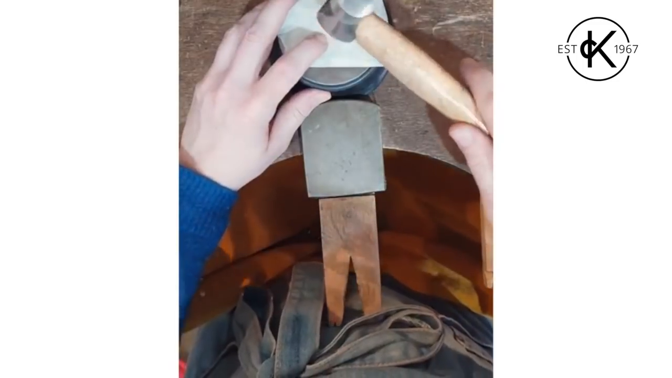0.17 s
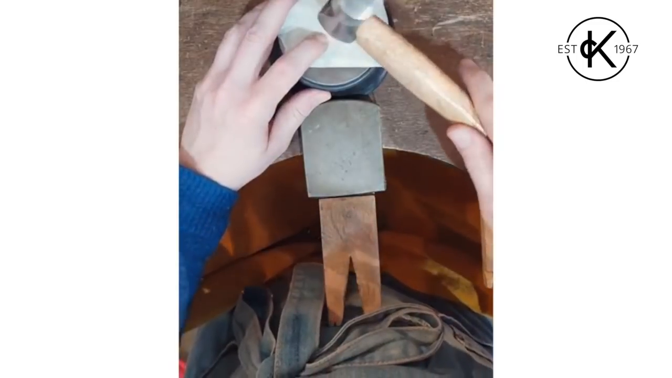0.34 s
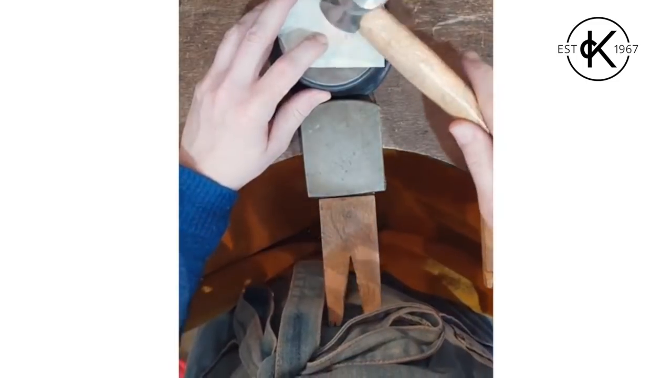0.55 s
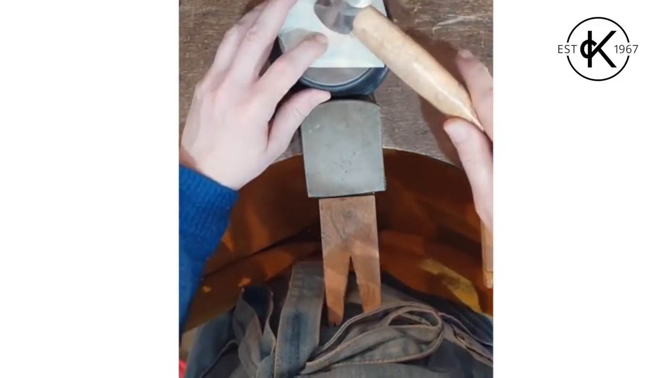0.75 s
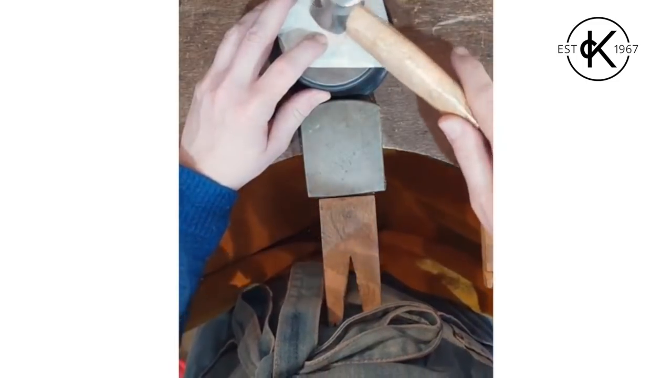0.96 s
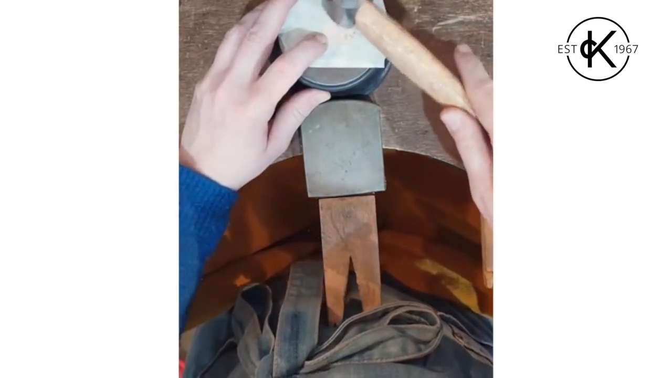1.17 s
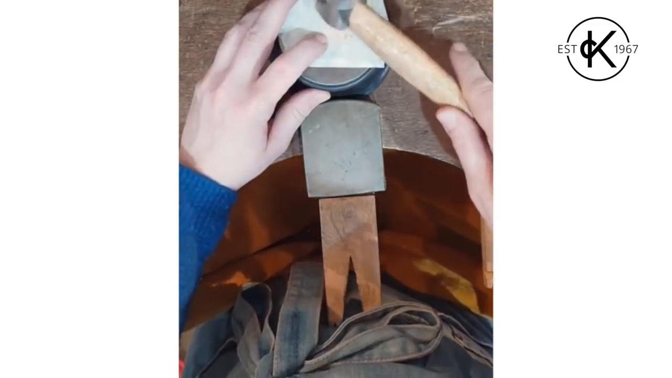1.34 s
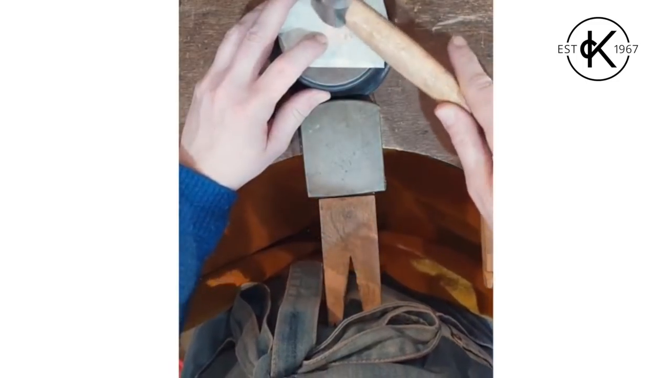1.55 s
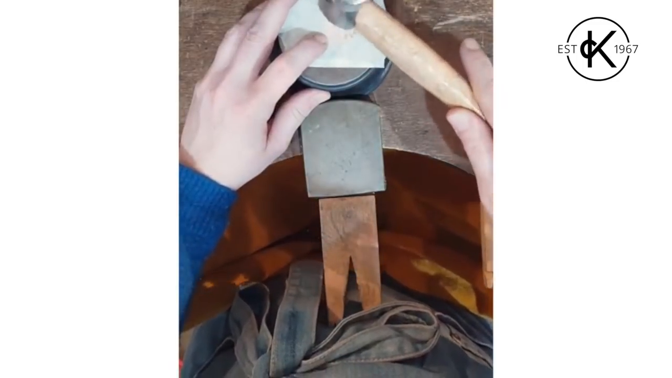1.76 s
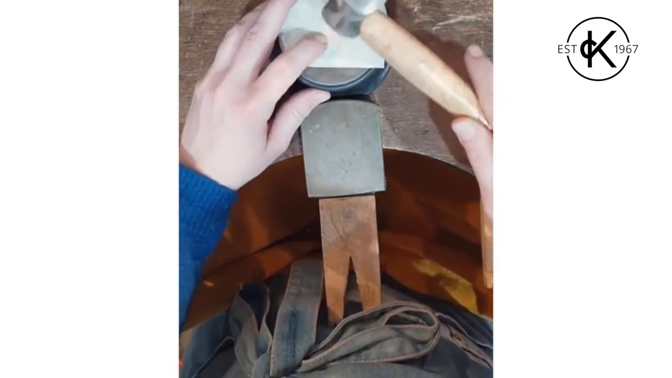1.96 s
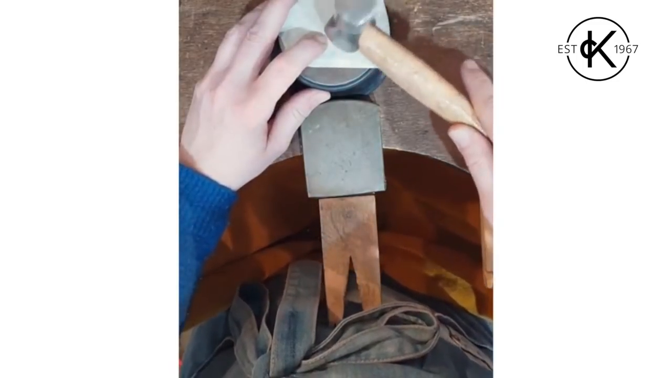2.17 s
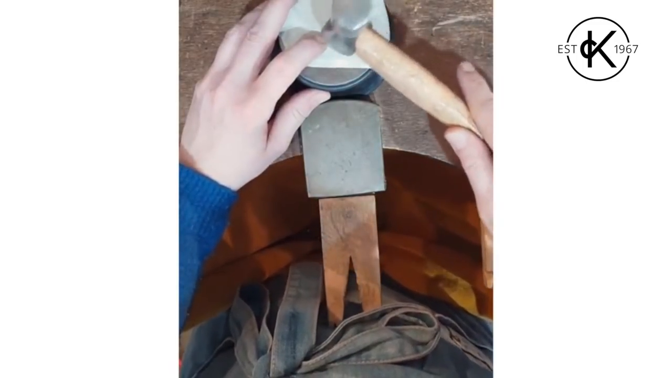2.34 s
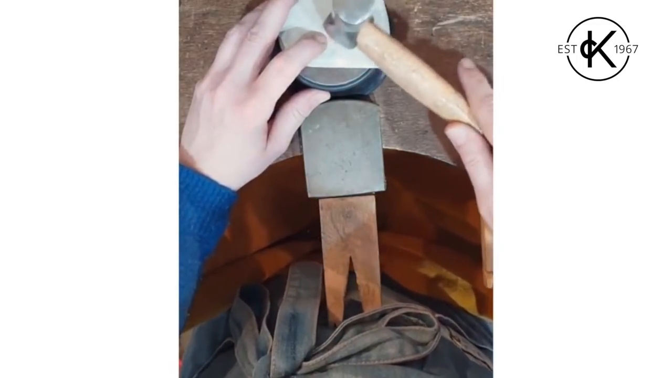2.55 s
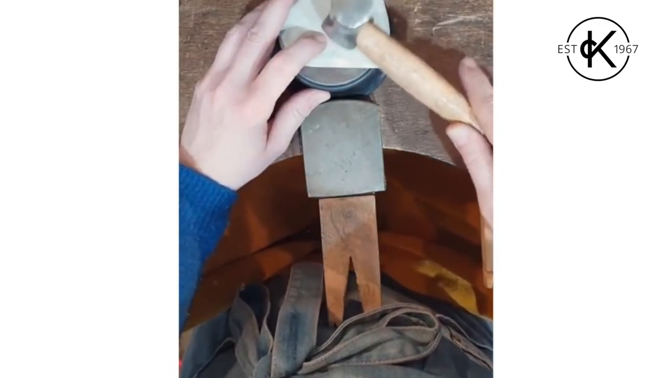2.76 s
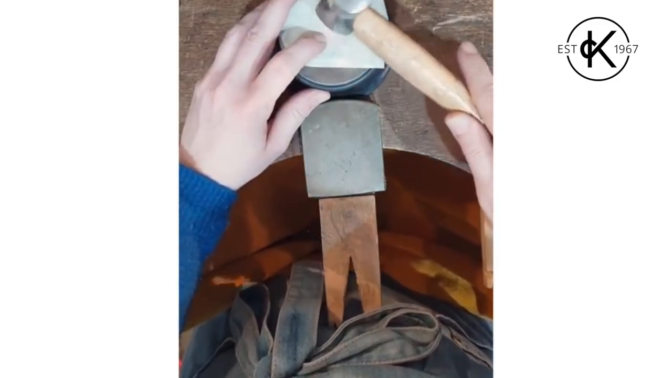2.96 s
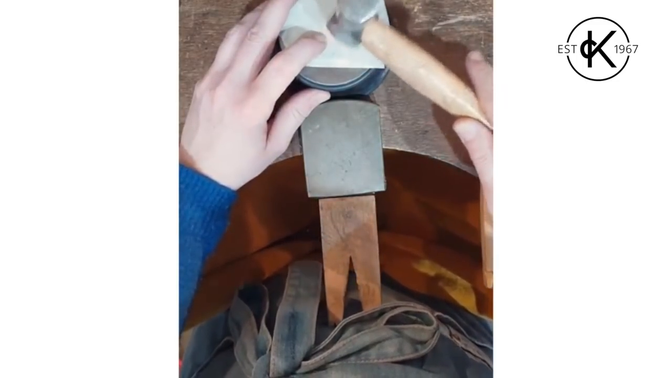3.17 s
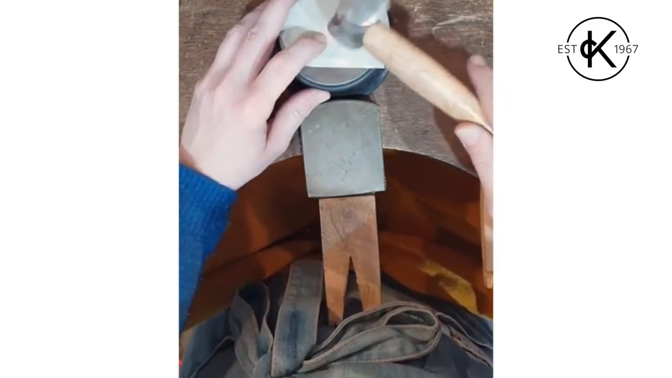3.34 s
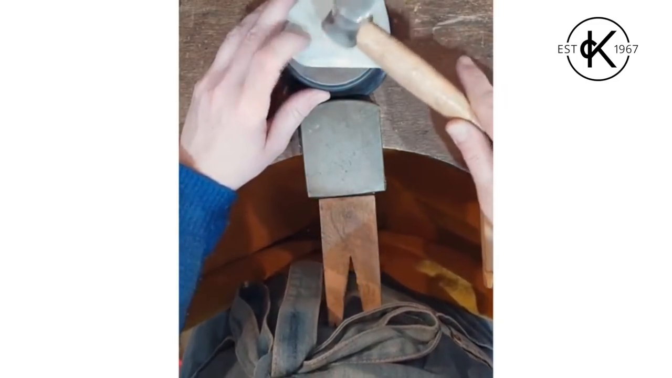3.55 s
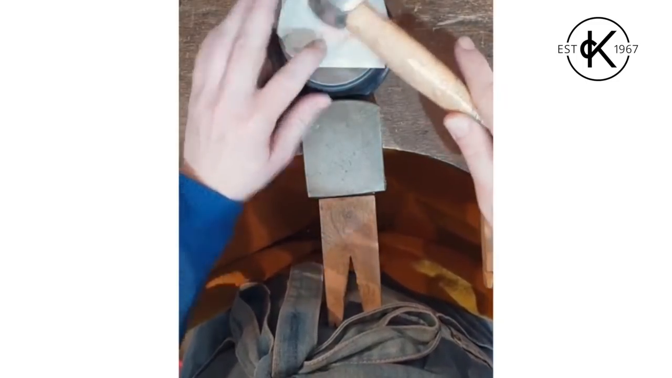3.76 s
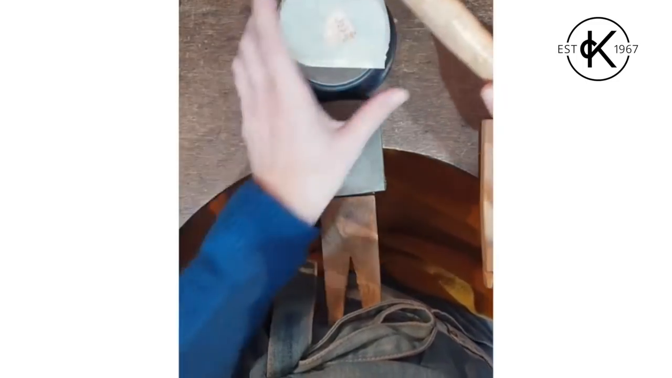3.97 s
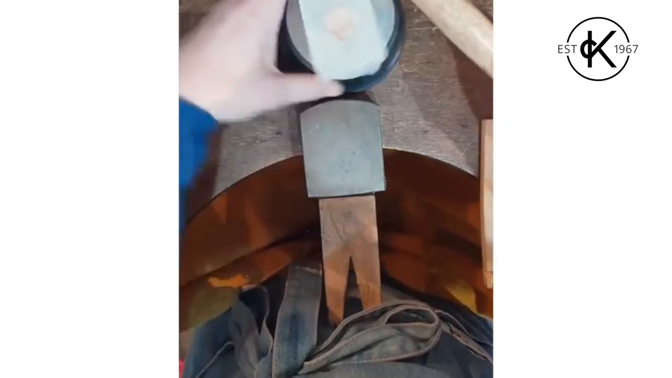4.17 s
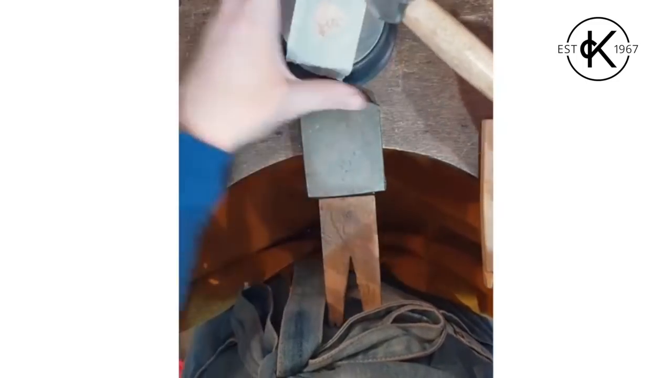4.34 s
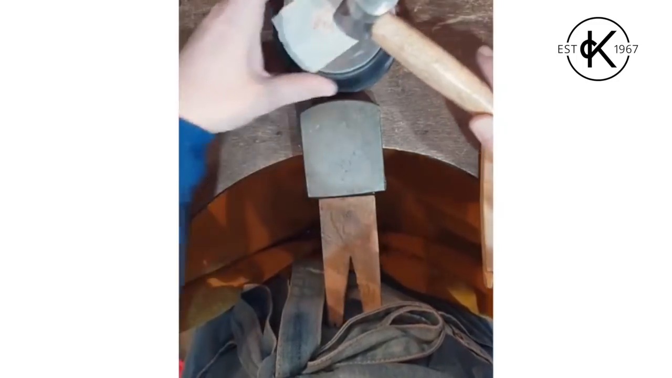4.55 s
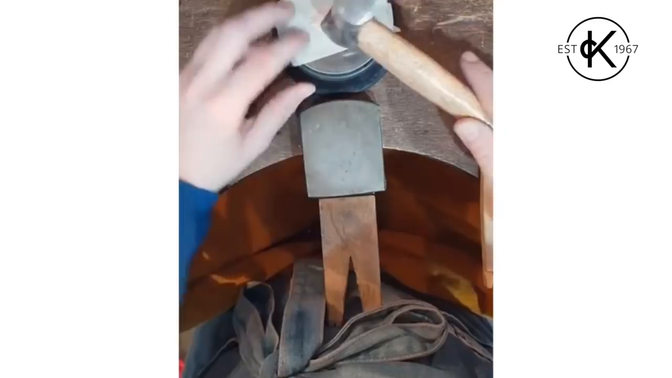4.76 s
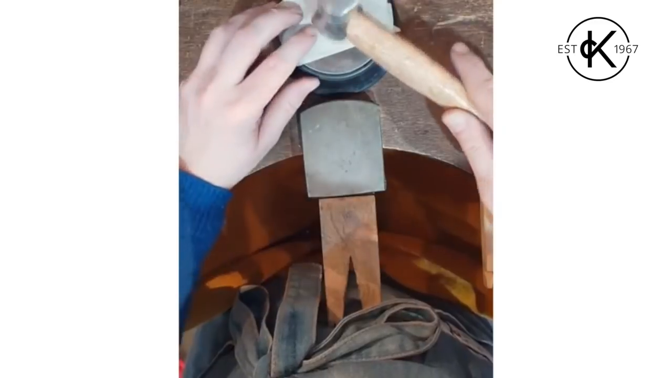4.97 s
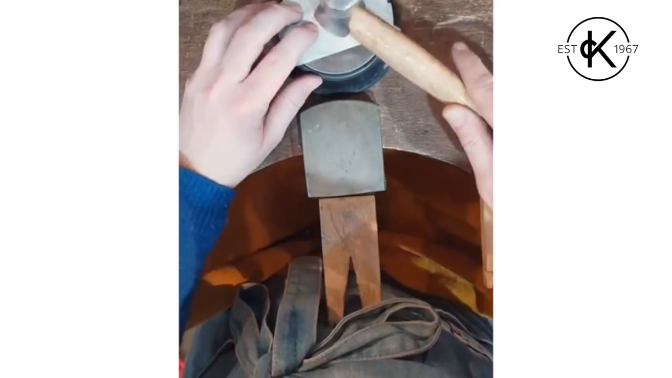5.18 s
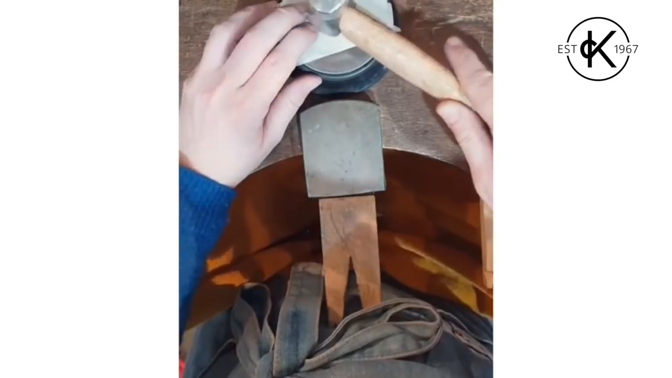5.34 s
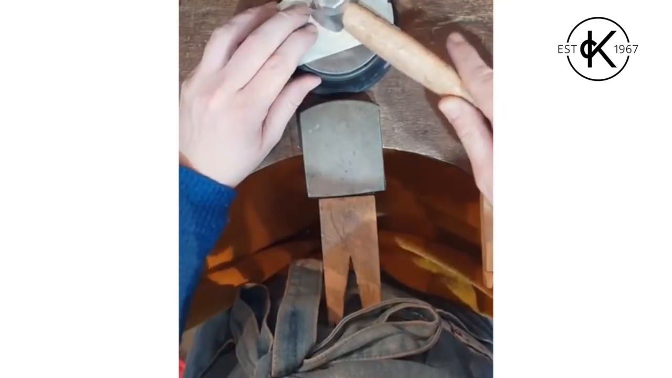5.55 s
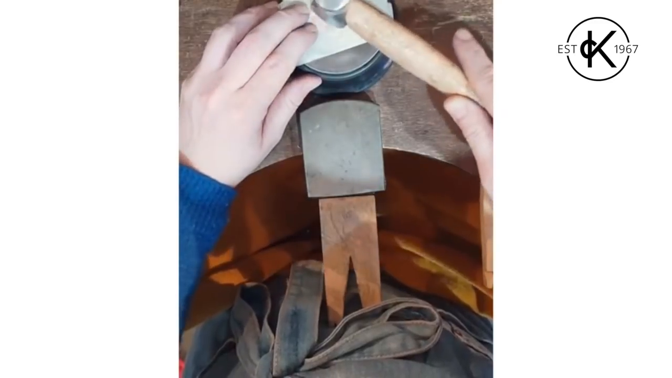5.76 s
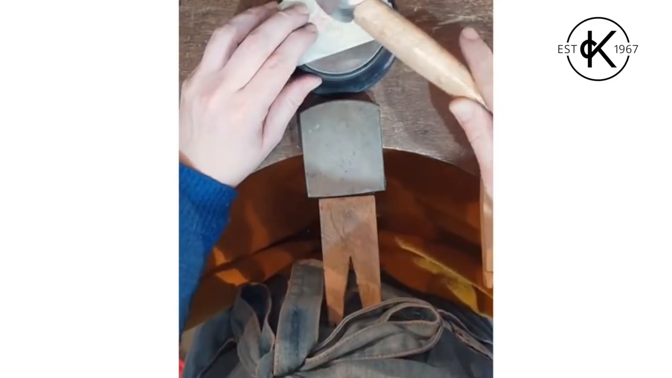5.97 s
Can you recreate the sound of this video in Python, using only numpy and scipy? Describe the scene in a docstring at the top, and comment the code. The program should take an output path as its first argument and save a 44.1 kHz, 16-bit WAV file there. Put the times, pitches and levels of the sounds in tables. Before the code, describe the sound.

Close stereo pickup in a small dry workshop: a light steel hammer taps sheet metal on a steel block, five or six bright clinks a second over a hollow wooden bench knock. After 22 blows it stops; a hand turns the block with a faint scrape and dull bump. Then six more blows, hard at first, then easing.

```python
"""A small steel hammer taps taped sheet metal on a steel block on a wooden bench, in a small, dry workshop.
First come 22 blows, five or six a second: a bright, quickly damped clink of steel modes and crack over
the hollow knock of bench modes, with a faint jangle and the room's answer.
In a pause a hand turns the block: shaped noise makes its scrape, dull bump and sheet ticks.
Then six more blows, hard at first. Soft noise gives the low hush of the room throughout."""
import sys
import numpy as np
from scipy import signal
from scipy.fft import rfft, irfft, next_fast_len
from scipy.io import wavfile
from scipy.ndimage import map_coordinates

SR = 44100
rng = np.random.default_rng(int(sys.argv[2]) if len(sys.argv) > 2 else 0)


def wav_record(signal):
    """Record a signal, one row per channel, as 16-bit PCM in the file named by sys.argv[1]."""
    frames = np.transpose(np.atleast_2d(signal))
    bounded = np.clip(frames, -1, 1)
    # unit amplitude maps onto the largest positive 16-bit level
    quanta = np.round(bounded * 32767).astype(np.int16)
    wavfile.write(sys.argv[1], SR, quanta)


N = 265041
TOP_HZ = 10500  # band limit

# hammer blows; edge is how sharply the face catches the sheet:
# (time [s], force over a light tap [dB], edge [dB])
BLOWS = [(-0.048, 4.5, 1.5), (0.1277, 5.5, 2), (0.3144, 3, 0.6), (0.495, 2.5, 3.5), (0.6831, 1, 0.2),
         (0.8613, 1, 0), (1.0439, 0.6, 1.5), (1.217, -.5, -1.5), (1.391, 1, -3.6), (1.5621, -0.9, -0.7),
         (1.7232, -0.75, -1), (1.9042, 0.5, 0), (2.0708, -.6, 3), (2.244, -0.5, 2.5), (2.411, -1, 1.7),
         (2.5821, 0.5, -2), (2.758, -0.76, 1.2), (2.9274, -1, 2), (3.0885, 0.5, -0.9), (3.2579, .5, 3.5),
         (3.428, 1.4, 1.2), (3.5933, -0.9, 7), (5.0253, 8.5, 1.5), (5.2204, 8.5, -3), (5.4062, 6, -1),
         (5.5764, 3, 2.5), (5.7435, 1.35, 0), (5.9113, 0, -1.5)]
# spectrum of steel meeting sheet: (frequency [Hz], density [dB per Hz])
CRACK_SPECTRUM = [(300, -21), (900, -10.5), (1800, -3.5), (2450, -10.5), (3400, 3.5), (4400, 9.5),
                  (5400, 7.5), (7200, 4.5), (8300, -5), (9500, -6.5), (10800, -43.5)]
# decay of workshop and loose metal: (frequency [Hz], t60 [s])
WORKSHOP_DECAY = [(100, 0.49), (500, 0.2), (1200, 0.21), (3000, 0.2), (4600, .19), (7500, 0.18),
                  (10000, 0.042)]


def amp(db):
    """Decibels to gain."""
    return 10 ** (np.asarray(db) / 20)


def unit(x):
    """x at rms 1."""
    return x / np.sqrt(np.mean(x ** 2) + 1e-20)


def along(points, hz):
    """(Hz, value) points interpolated on a log frequency axis."""
    f, v = np.transpose(points)
    return np.interp(np.log(hz + 1), np.log(f + 1), v)


def filtered(x, response):
    """x times a response of frequency."""
    n = x.shape[-1]
    m = next_fast_len(n + SR // 8)
    spectrum = rfft(x, m) * response(np.fft.rfftfreq(m, 1 / SR))
    return irfft(spectrum, m)[..., :n]


def tinted(x, colour):
    """x with the gains of a (Hz, dB) table."""
    return filtered(x, lambda hz: amp(along(colour, hz)))


def add(track, start_s, sound):
    """Mix a sound into a track from start_s on, cut to the track's ends."""
    start = round(start_s * SR)
    part = sound[..., max(-start, 0):max(track.shape[-1] - start, 0)]
    first = max(start, 0)
    track[..., first:first + part.shape[-1]] += part


def diffuse(spectrum, size):
    """Coloured noise of rms 1 that reaches the two microphones from all sides."""
    # left-right likeness of the diffuse field: (frequency [Hz], correlation)
    likeness = [(200, 0.98), (450, 0.93), (700, 0.43), (1200, 0.34), (2200, 0.088), (4000, -0.38),
                (9000, 1)]

    def mid_side_response(hz):
        angle = np.arccos(np.clip(along(likeness, hz), -1, 1)) / 2
        return amp(along(spectrum, hz)) * [np.cos(angle), np.sin(angle)]

    mid, side = filtered(rng.standard_normal((2, size)), mid_side_response)
    return unit(np.array([mid + side, mid - side]))


def click(spectrum, size=1024):
    """Minimum-phase pulse with this spectrum, peak 1: its energy comes as early as causality allows."""
    log_gain = np.log(amp(along(spectrum, np.fft.rfftfreq(size, 1 / SR))))
    cepstrum = irfft(log_gain)
    cepstrum[1:size // 2] *= 2
    cepstrum[size // 2 + 1:] = 0
    pulse = irfft(np.exp(rfft(cepstrum)))
    return pulse / np.abs(pulse).max()


def clink(t, crack_db=-6, chatter_db=-18, chatter_t60_s=0.026, vary_db=0.7, detune=0.016):
    """Steel meets sheet: a crack, a brief chatter of the sheet on the block, and a damped ring."""
    # modes of hammer head, sheet and block, damped by tape and hand, before each blow's variation:
    # (frequency [Hz], level [dB], t60 [s])
    steel_modes = [(1050, -30, .03), (1380, -30, .035), (1800, -26, .018), (2120, -39, .11),
                   (2780, -37, .09), (3150, -21, .012), (3950, -19, .01), (4190, -14, .014),
                   (4580, -12.5, .015), (4610, -37, .1), (4950, -21, .008), (5450, -21, .011),
                   (5850, -20, .011), (7050, -20, .011), (9350, -31, .01), (856, -55, .6)]
    # paths from the hammer face, direct and off block, bench top and hand:
    # (left delay [s], right delay [s], left level [dB], right level [dB])
    paths = [(0, .0002, 0, -1.5), (.00065, .00088, -11, -9), (.002, .00215, -9, -12),
             (.00262, .00275, -13, -14)]
    hz, db, t60 = np.transpose(steel_modes)[:, :, None]
    size, shift = rng.standard_normal((2, *hz.shape))  # every blow lands on a new spot
    fade = amp(db + vary_db * size - 60 * t / t60)
    strike = -(fade * np.sin(2 * np.pi * hz * (1 + detune * shift) * t)).sum(0)
    add(strike, 0, -amp(crack_db) * click(CRACK_SPECTRUM))
    pair = amp(chatter_db - 60 * t / chatter_t60_s) * diffuse(CRACK_SPECTRUM, len(t))
    for left_s, right_s, left_db, right_db in paths:
        add(pair[0], left_s, amp(left_db) * strike)
        add(pair[1], right_s, amp(right_db) * strike)
    return pair


def shading(depth_db, count):
    """A random (Hz, dB) ripple that deepens towards the treble: short waves depend most on the spot struck."""
    hz = np.linspace(0, TOP_HZ, count)
    ripple_db = depth_db * (hz / TOP_HZ) ** (1 / 3) * rng.standard_normal(count)
    return np.column_stack([hz, ripple_db])


def bench(t, vary_db=1.14):
    """The block pushes the bench top down; its modes build up and die away."""
    # modes of the wooden bench: (frequency [Hz], level [dB], t60 [s], build-up [s])
    bench_modes = [(76.7, -33, 0.36, 0.0336), (94.1, -14.5, 0.18, 0.061), (140.3, -20, 0.258, 0.11),
                   (176.7, -28, 0.24, 0.0026), (227.9, -18, 0.18, 0.0012), (262, -13, 0.095, 0.0052),
                   (310, -32, 0.12, 0.087), (342.3, -15, 0.15, 0.052), (381, -17.5, 0.12, 0.0029),
                   (447.6, -27, 0.13, 0.0018), (466.9, -18, 0.13, 0.0045), (508.2, -28.5, 0.18, 0.0185),
                   (562.8, -16.5, 0.092, 0.0061), (594.8, -26.5, 0.186, 0.0018),
                   (640.4, -30.5, 0.166, 0.0051), (837, -40.5, 0.25, 0.018), (905.3, -31, 0.119, 0.0059)]
    # lead of the bench's sound at the left microphone: (frequency [Hz], phase [rad])
    left_lead = [(100, 0.11), (400, 0.25), (560, 1.08), (690, 2.3), (1000, 1.7)]
    hz, db, t60, rise = np.transpose(bench_modes)[:, :, None]
    swell = amp(db - 60 * t / t60) * (1 - np.exp(-t / rise))
    lag_rad = np.array([0 * hz, along(left_lead, hz)])  # left, right
    modes = -swell * np.sin(2 * np.pi * hz * t - lag_rad)
    strengths = amp(vary_db * rng.standard_normal((len(BLOWS), len(hz))))
    return strengths @ modes  # channels x blows x time


def jangle(t, count=170, vary_db=4, lag_s=.00022, scatter_rad=0.47, build_s=0.0026):
    """Many weak metal modes, the same for every blow but at new random strengths."""
    # dense, faint ringing of the metal on the bench: (frequency [Hz], level per mode [dB])
    jangle_levels = [(950, -0.5), (1500, -2.5), (1900, 3.5), (2300, -4), (3000, 0), (3900, 2.5), (4600, 3),
                     (5000, -3), (7200, -3), (8000, -11.5), (9500, -30)]
    hz = np.linspace(jangle_levels[0][0], jangle_levels[-1][0], count)[:, None]
    hz = hz + rng.normal(0, 25, (count, 1))
    phase = 2 * np.pi * (hz * t + rng.random((count, 1)))
    right_lag_rad = 2 * np.pi * hz * lag_s + scatter_rad * rng.standard_normal((count, 1))
    fade = amp(along(jangle_levels, hz) - 60 * t / along(WORKSHOP_DECAY, hz))
    modes = fade * (1 - np.exp(-t / build_s)) * np.sin([phase, phase - right_lag_rad])
    strengths = amp(vary_db * rng.standard_normal((len(BLOWS), count)))
    return strengths @ modes / np.sqrt(count)  # channels x blows x time


def rattle(t, depth_db=2, rate_hz=260):
    """The uneven gain, rms 1, of loose metal that keeps touching the block while it rings."""
    wander = map_coordinates(rng.standard_normal(len(t) // 20), [t * rate_hz])
    return unit(amp(depth_db * wander))


def detuned(pair, depth=.005):
    """A ring made slightly higher or lower: the hand's pressure on the sheet changes from blow to blow."""
    at = np.arange(pair.shape[-1]) * (1 + depth * rng.standard_normal())
    return np.array([map_coordinates(side, [at]) for side in pair])


def walls(t, build_s=0.002):
    """The workshop's answer: a diffuse tail in which every frequency dies at its own speed."""
    # spectrum of the answer at its start: (frequency [Hz], density [dB per Hz])
    answer_spectrum = [(30, -15.5), (80, -7.5), (250, 0.5), (600, 8), (740, 2.5), (950, 4), (1500, -3),
                       (2400, -0.5), (3900, -2.5), (4600, 5.5), (5000, -6.5), (7300, -7), (8300, -26),
                       (10500, -42.5)]
    hz, when, z = signal.stft(diffuse(answer_spectrum, len(t)), SR, nperseg=256)
    decay = amp(-60 * when / along(WORKSHOP_DECAY, hz)[:, None])
    tail = signal.istft(z * decay, SR, nperseg=256)[1]
    return tail[:, :len(t)] * (1 - np.exp(-t / build_s))


def blow_colour(force_db, edge_db):
    """(Hz, dB) balance of a blow: force adds most in the bass, edge in the treble."""
    # (frequency [Hz], light tap [dB], gain per force [dB/dB], gain per edge [dB/dB])
    growth = [(70, -1.4, 1.22, 0.43), (171.3, 0, 1.08, 0), (550, 0.5, 0.92, 0), (1420, 1.5, 0.99, 0.29),
              (4130, -3, .5, 0.16), (6770, -1.52, 0.78, 0.99)]
    return [(hz, db + per_force * force_db + per_edge * edge_db) for hz, db, per_force, per_edge in growth]


def hammer(bench_db=0, jangle_db=-25.0, room_db=-25.0, steady=0.5, spot_db=2, ripple_db=4.0,
           jangle_growth=0.58, clink_hold=0.73):
    """Blow after blow: the steel clinks, the bench knocks, loose metal jangles and the workshop answers."""
    track = np.zeros((2, N))
    t = np.arange(SR // 3) / SR
    knocks = amp(bench_db) * bench(t)
    jangles = amp(jangle_db) * jangle(t)
    same_paths = walls(t)  # the hammer hardly moves, so the room's answer partly repeats
    for k, (start_s, force_db, edge_db) in enumerate(BLOWS):
        # the level limit holds the clink back on heavy blows
        steel = amp(-clink_hold * force_db) * tinted(clink(t), shading(spot_db, count=20))
        room = amp(room_db) * (np.sqrt(steady) * same_paths + np.sqrt(1 - steady) * walls(t))
        # after a heavy blow the jangle stands louder against the limited clink
        loose = amp(jangle_growth * force_db) * rattle(t) * detuned(jangles[:, k])
        tail = tinted(loose + room, shading(ripple_db, count=56))
        blow = knocks[:, k] + steel + tail
        add(track, start_s, tinted(blow, blow_colour(force_db, edge_db)))
    return track


def hush():
    """The still room: steady diffuse noise, rms 1."""
    # (frequency [Hz], density [dB per Hz])
    hush_spectrum = [(20, 0), (38, -2.5), (160, 1.5), (300, -17), (600, -24), (1200, -37.5), (3500, -27.5),
                     (7000, -28), (9500, -39.5), (11000, -61)]
    return diffuse(hush_spectrum, N)


def turning(rumble_db=11, grit_db=2, grit_rate_hz=150, tick_t60_s=0.022):
    """The block's base drags unevenly over the wood and settles; the sheet ticks as it is gripped anew."""
    # sheet ticks under the fingers: (time [s], level [dB])
    ticks = [(4.236, -53), (4.295, -46.5), (4.325, -63), (4.37, -61), (4.483, -59)]
    # pushes of the block round on the bench: (start [s], length [s], scrape level [dB])
    slides = [(4.248, 0.059, -54), (4.572, 0.049, -67.5)]
    # low and high part of the drag: (frequency [Hz], density [dB per Hz])
    rumble_spectrum = [(40, -11), (90, -4.5), (165, 1), (230, -8), (275, -3), (340, -24.5), (550, -27.5),
                       (800, -27.5), (1500, -76)]
    scrape_spectrum = [(300, -35), (550, 3.5), (720, -10.5), (950, -6), (1400, -15), (2700, -17),
                       (5500, -22), (8000, -30), (10500, -58)]
    rise_db_per_s, fall_db_per_s = 226, 215
    settle_s, settle_db, settle_rise_s, settle_t60_s = 4.3, -32, 0.013, .3
    t = np.arange(N) / SR
    push = np.zeros(N)
    for start_s, length_s, db in slides:
        before_s = np.maximum(start_s - t, 0)
        after_s = np.maximum(t - start_s - length_s, 0)
        push += amp(db - rise_db_per_s * before_s - fall_db_per_s * after_s)
    # between the pushes the block rocks back flat with a dull bump
    since_s = np.maximum(t - settle_s, 0)
    bump = amp(settle_db - 60 * since_s / settle_t60_s) * (1 - np.exp(-since_s / settle_rise_s))
    grit = amp(grit_db * map_coordinates(rng.standard_normal(N // 20), [t * grit_rate_hz]))
    rumble = (amp(rumble_db) * push + bump) * diffuse(rumble_spectrum, N)
    scrape = push * unit(grit * diffuse(scrape_spectrum, N))
    track = rumble + scrape
    short = t[:SR // 8]
    for start_s, db in ticks:
        add(track, start_s, amp(db - 60 * short / tick_t60_s) * diffuse(CRACK_SPECTRUM, len(short)))
    return track


def scene(hush_db=-65, left_db=0.3):
    """Hammer and block lie a little to the left, over the low hush of the room."""
    work = (hammer() + turning()) * amp([[left_db], [-left_db]])
    return work + amp(hush_db) * hush()


def record(dry, low_hz=54, ceiling=.86):
    """The recorder sheds the deepest bass, rounds off the highest peaks and cuts steeply at its band limit."""
    lean = signal.lfilter(*signal.butter(2, low_hz, "high", fs=SR), dry)
    rounded = lean / (1 + np.abs(lean / ceiling) ** 6) ** (1 / 6)
    return filtered(rounded, lambda hz: 1 / np.sqrt(1 + (hz / TOP_HZ) ** 100))


dry = scene()
out = record(dry)
wav_record(out)
```